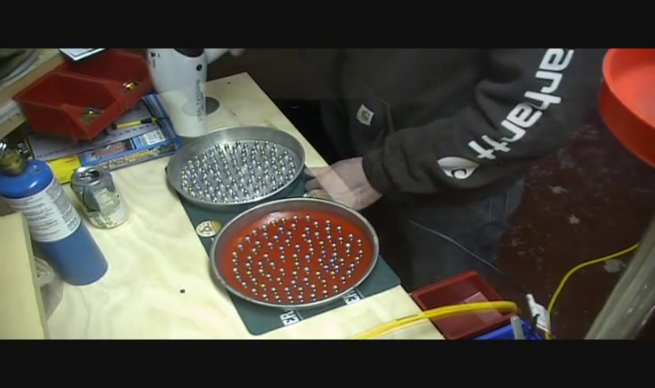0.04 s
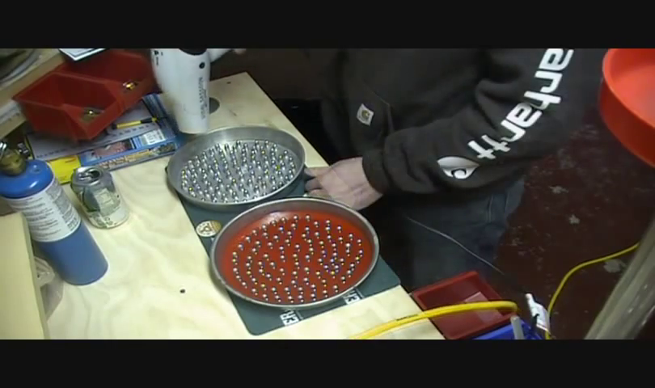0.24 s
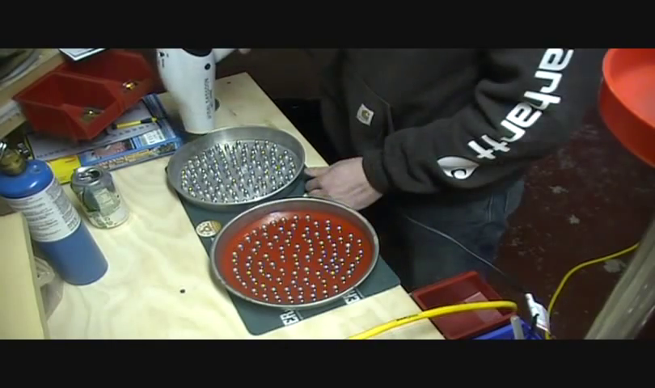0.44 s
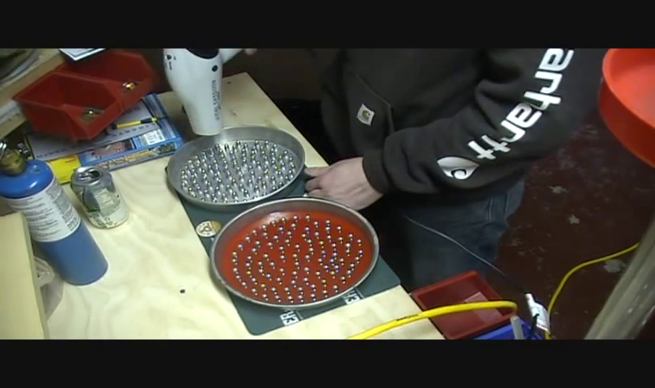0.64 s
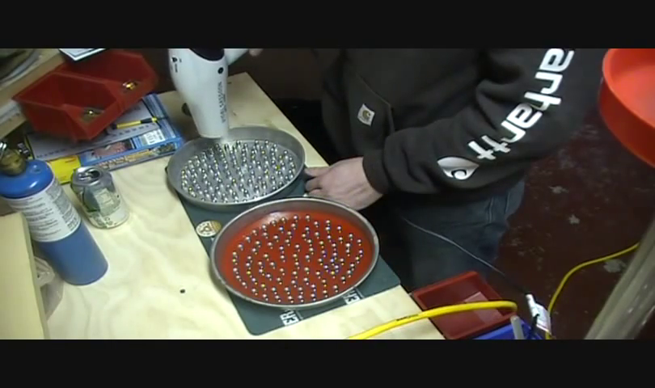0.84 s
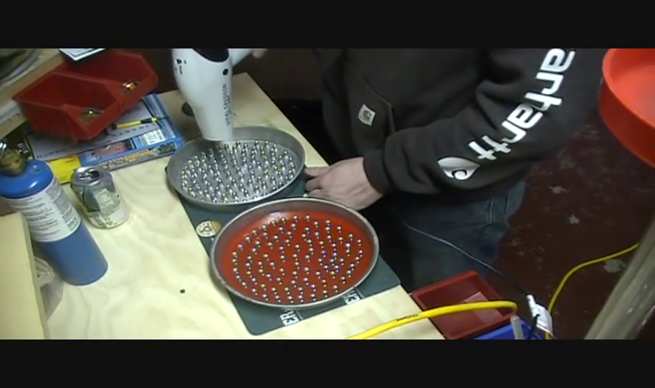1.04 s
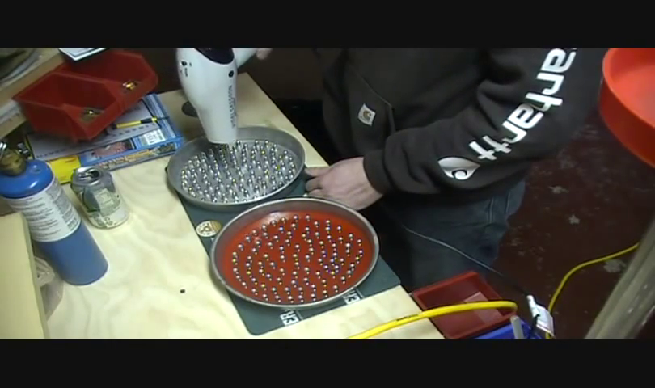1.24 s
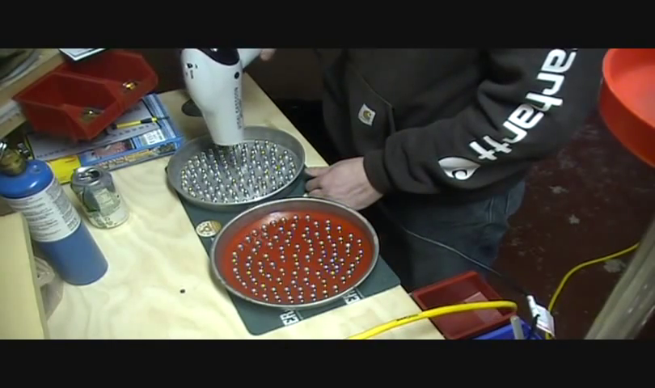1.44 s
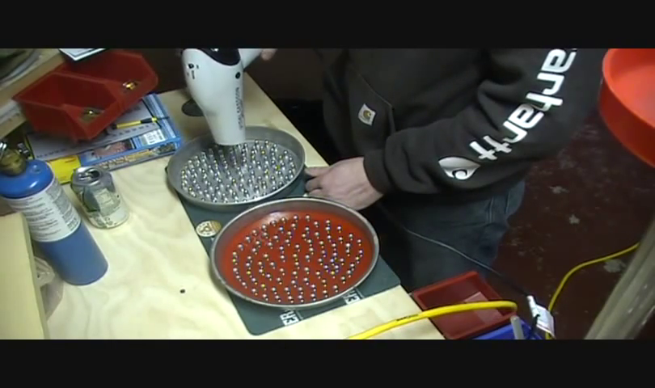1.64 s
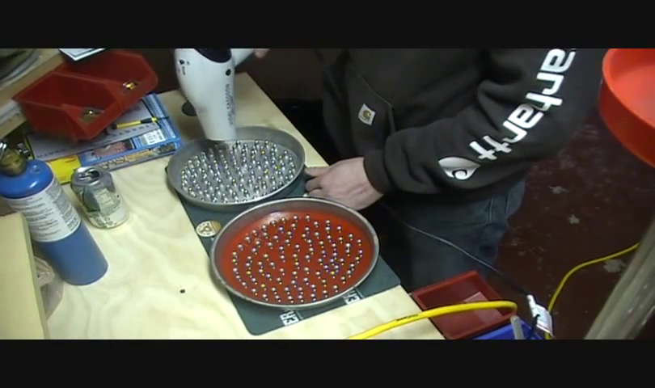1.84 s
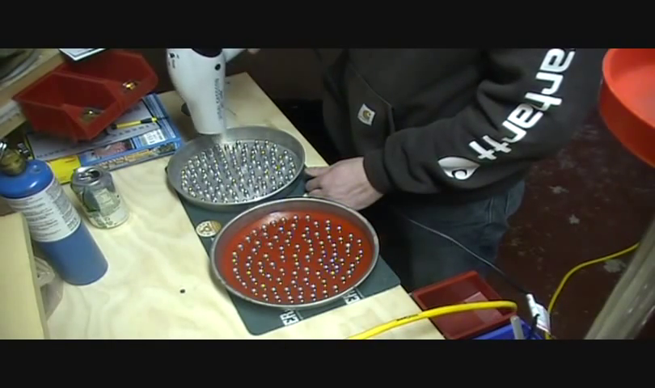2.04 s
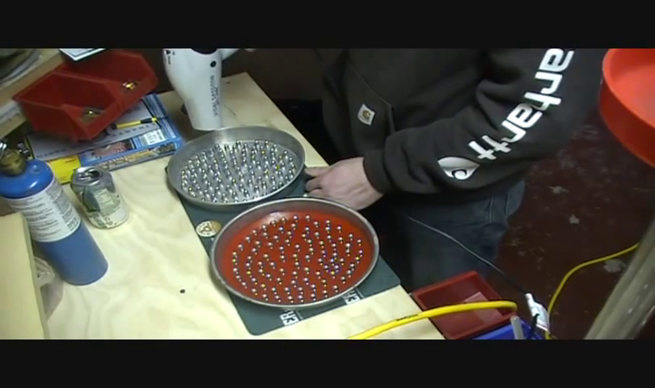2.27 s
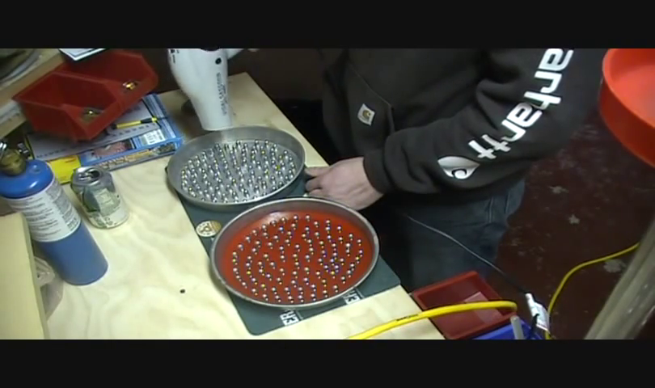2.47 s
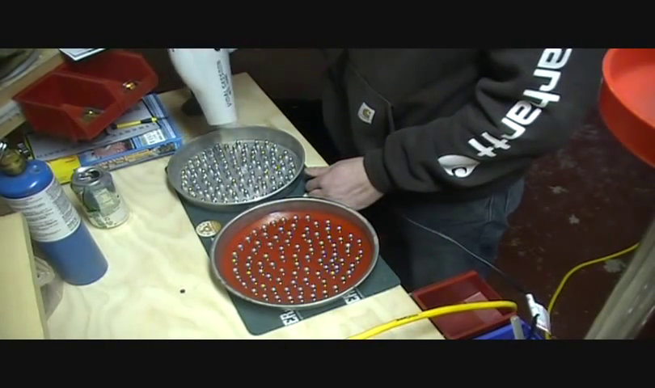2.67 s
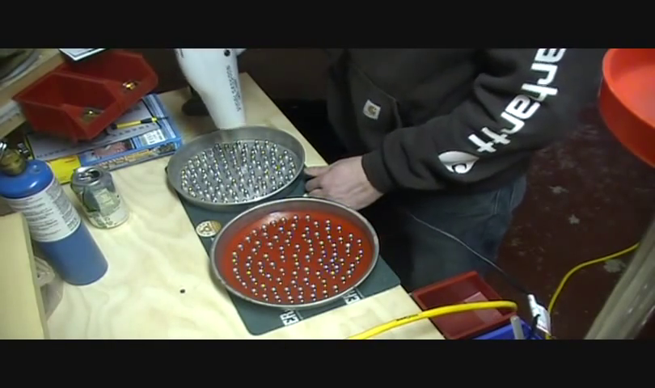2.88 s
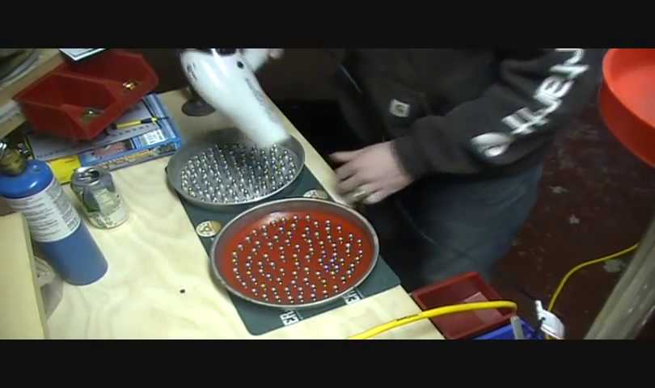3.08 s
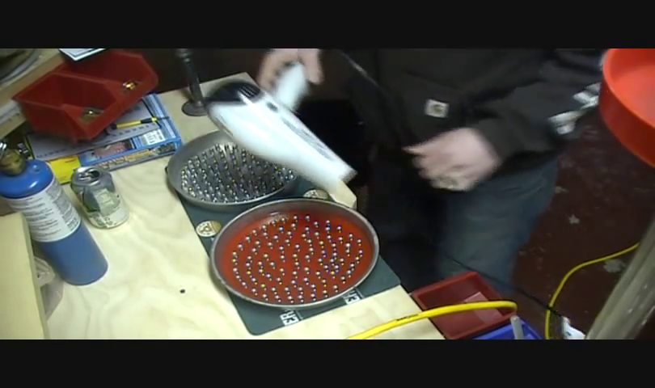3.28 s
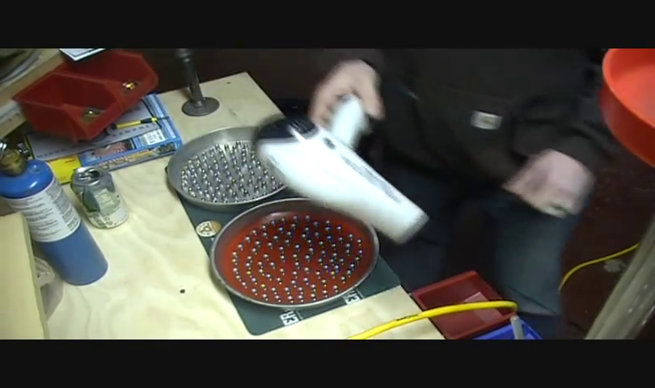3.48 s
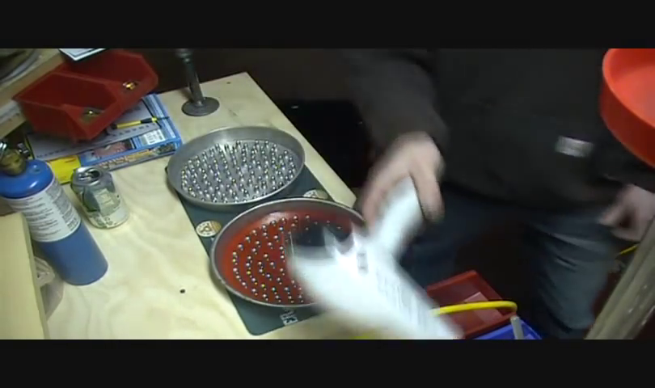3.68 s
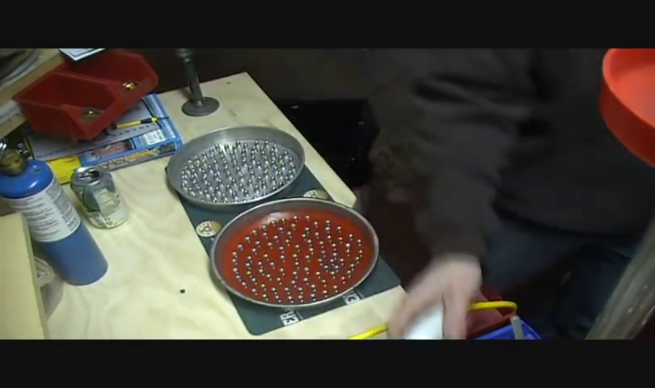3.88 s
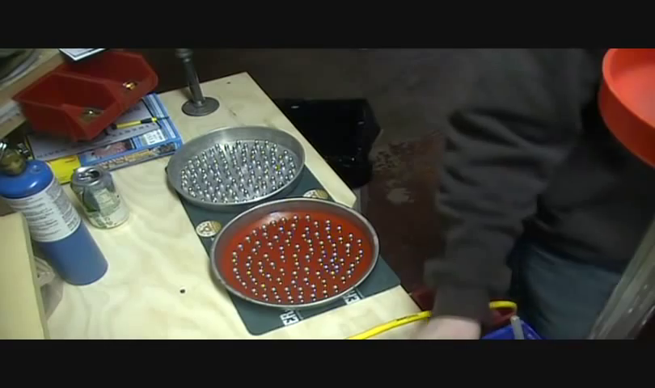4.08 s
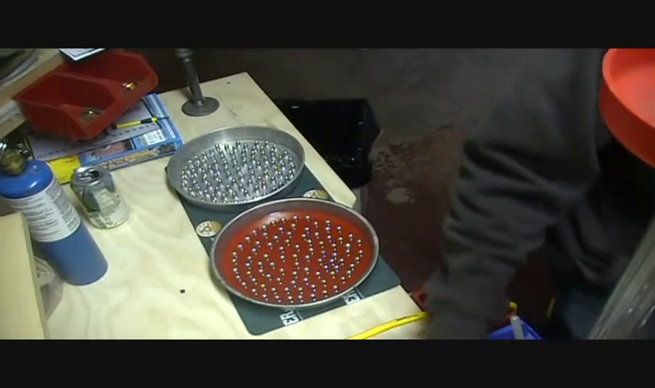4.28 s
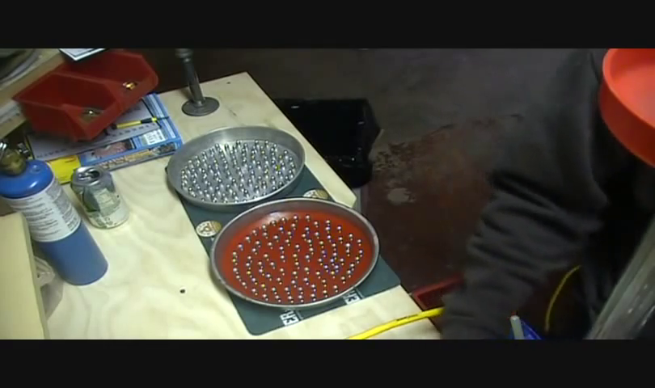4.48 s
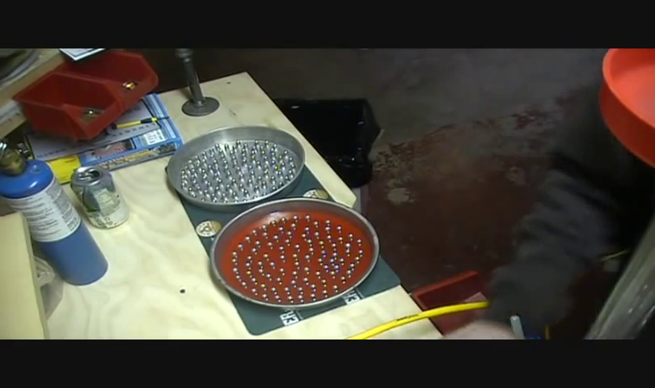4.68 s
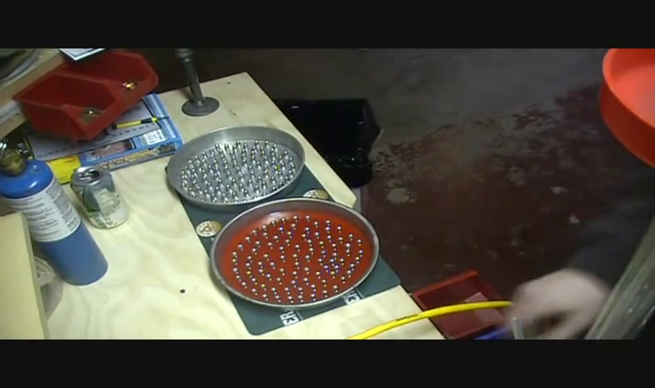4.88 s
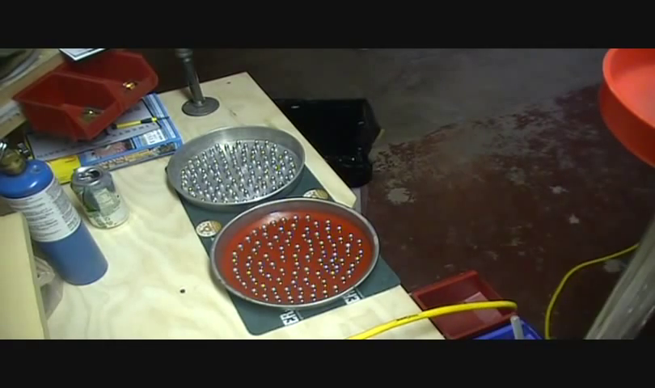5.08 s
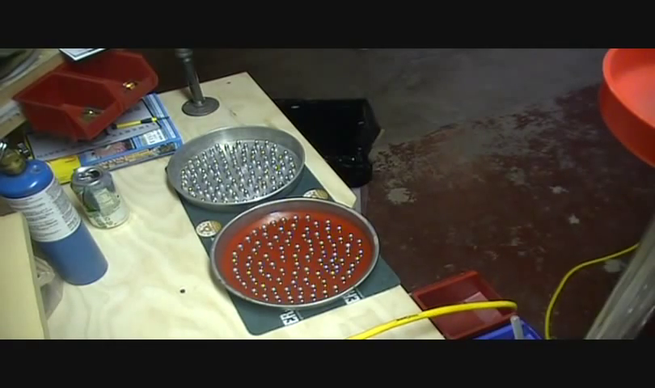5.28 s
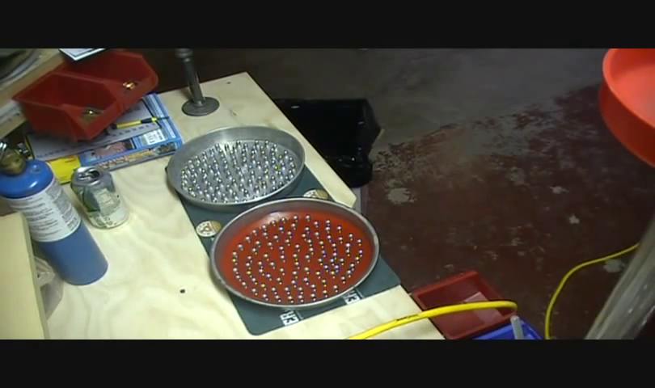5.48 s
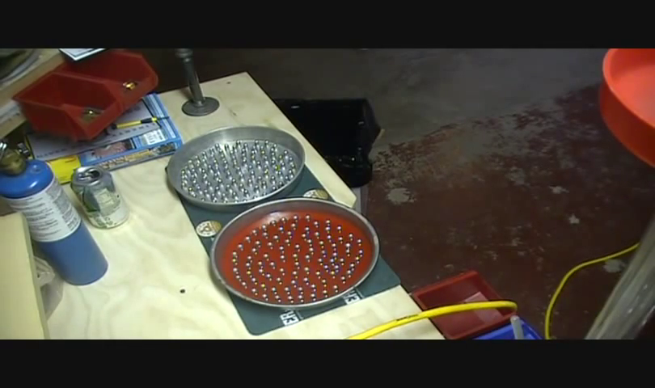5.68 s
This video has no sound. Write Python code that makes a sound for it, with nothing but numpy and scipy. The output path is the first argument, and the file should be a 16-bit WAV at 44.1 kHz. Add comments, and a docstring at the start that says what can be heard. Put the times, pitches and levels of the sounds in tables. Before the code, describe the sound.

A hair dryer runs close by in a small workshop, its broad airy roar carrying a steady whistle near 2 kHz. From about 0.2 s the air grows fuller as the nozzle drops towards a studded metal pan; sharp hiss flickers and the whistle wavers as it sweeps. At about 2.5 s the motor is cut: airflow dies and the fan whines steeply down until about 3.1 s, with a soft hollow swell. From 3.2 to 3.8 s cloth-like rustles mix with a cord's stick-slip scrape and plastic tray knocks, then the dryer's shell knocks at 3.75 s. The tray rattles again at 4.03-4.2 s. Loud dry knocks with a low thud land on the wooden bench at 4.36 s, and a sharper, louder rap at 4.59 s. Swishes swell after 5 s; a tool clinks brightly at 5.3 s and a pan faintly at 5.6 s. Quiet room noise lies beneath; close stereo microphone, short reverberation.

```python
"""A hair dryer (noise bands and blade-rate whistles) is swept over a metal pan in a small workshop.
It is switched off: the airflow dies and the fan whines down, with a soft hollow swell of noise.
Then cloth-like noise swells and swishes, and the cord drags over a plastic tray as stick-slip noise.
Tray and dryer are knocked, the dryer goes down on the wooden bench, a tool and a pan clink: struck modes.
Quiet room noise lies under everything."""
import sys
import numpy as np
from scipy import signal
from scipy.fft import rfft, irfft
from scipy.io import wavfile
from scipy.ndimage import uniform_filter1d, minimum_filter1d

SR = 44100
rng = np.random.default_rng(int(sys.argv[2]) if len(sys.argv) > 2 else 0)


def unload_wav(signal):
    """Save mono or channel-first audio to the path in sys.argv[1] as 16-bit WAV at rate SR, clipped to [-1, 1]."""
    wavfile.write(
        sys.argv[1],
        SR,
        np.round(np.clip(np.atleast_2d(signal).T, -1, 1) * 32767).astype(np.int16),
    )


N = 252252
T = np.arange(N) / SR
HZ = np.maximum(np.fft.rfftfreq(N, 1 / SR), 1)


def amp(db):
    """Decibels to gain."""
    return 10 ** (np.asarray(db) / 20)


def unit(x):
    """Scale to rms 1."""
    return x / np.sqrt(np.mean(x ** 2) + 1e-20)


def in_time(rows):
    """The columns of a curve at every sample."""
    s, *columns = np.transpose(rows)
    return [np.interp(T, s, c) for c in columns]


def at_hz(points, hz):
    """Read a table on a log-frequency axis."""
    f, value = np.transpose(points)
    return np.interp(np.log(hz), np.log(f), value)


def swell(middle_s, length_s):
    """A smooth rise and fall of height 1, length_s wide at half height."""
    return .5 ** ((2 * (T - middle_s) / length_s) ** 2)


def drift(corner_hz):
    """Slow chance with rms 1: noise falling off above corner_hz."""
    spectrum = rfft(rng.standard_normal(N)) / (1 + (HZ / corner_hz) ** 2)
    return unit(irfft(spectrum, N))


def lift_db(hz, resonances):
    """How much a set of resonances lifts each frequency."""
    return sum(lift / (1 + (2 * (hz - centre) / width) ** 2) for centre, width, lift in resonances)


# Stereo width. Each row: frequency in Hz, unrelated side against mid in dB.
SIDE_WIDTH = [(60, -17), (200, -16), (500, -19.5), (1100, -12), (1700, -15), (2600, -10), (3500, -10),
              (4400, -15), (6000, -15.5), (7000, -16.5), (8000, -10.5), (9300, -4), (12500, -10),
              (14000, -7)]


def noise(colour, resonances=()):
    """Stereo noise with a broad colour, lifted at each resonance; the mid has rms 1."""
    gain = amp(at_hz(colour, HZ) + lift_db(HZ, resonances))
    mid, side = rfft(rng.standard_normal((2, N))) * gain
    mid = irfft(mid, N)
    side = irfft(side * amp(at_hz(SIDE_WIDTH, HZ)), N)
    return (mid + side * [[1], [-1]]) / np.std(mid)


# Reverberation. Each row: frequency in Hz, decay by 60 dB in seconds.
ROOM_DECAY = [(125, 0.9), (500, 0.5), (1200, 0.52), (2800, 0.54), (6000, 0.36), (12000, 0.4)]
# Echo colour. Each row: frequency in Hz, relative level in dB.
ECHO_COLOUR = [(100, -5.5), (700, 8), (1250, 4), (3000, 1.5), (7000, 6), (13000, -1)]


def workshop(early_db=2.0, early_s=0.03, gap_s=0.0017, scatter_db=3., spots=5):
    """Echoes of a click at several spots: reflections off the bench, then a grainy tail dying band by band."""
    t, echo = T[:SR], 0
    wash = np.stack(np.split(noise(ECHO_COLOUR)[:, :spots * SR], spots, axis=1))
    edges_hz = np.geomspace(60, 15000, 9)
    for low, high in zip(edges_hz, edges_hz[1:]):
        band_pass = signal.butter(2, [low, high], "band", fs=SR, output="sos")
        band = signal.sosfilt(band_pass, np.roll(wash, int(low), axis=-1))
        t60_s = at_hz(ROOM_DECAY, np.sqrt(low * high))
        echo = echo + band * amp(-60 * t / t60_s)
    early = 1 + amp(early_db) * np.exp(-t / early_s)
    onset = 1 - np.exp(-(t / gap_s) ** 2)
    scatter = amp(scatter_db * drift(130)[:spots * SR].reshape(spots, 1, SR))
    echo = echo * early * onset * scatter
    return echo / np.sqrt(np.sum(echo ** 2) / (2 * spots))


def with_echo(tones, echo, room_db):
    """Tones in the middle, plus their echo from the workshop."""
    return tones + amp(room_db) * signal.fftconvolve(tones[None], echo, axes=1)[:, :N]


# Room noise colour. Each row: frequency in Hz, relative level per Hz in dB.
FLOOR_COLOUR = [(25, -26), (55, -17), (85, 2), (130, -1), (250, 1.5), (600, 7), (1500, 1), (5000, -20),
                (14000, -20.5)]


def room_floor(level_db=-61.5):
    """Steady coloured noise of the quiet room."""
    return amp(level_db) * noise(FLOOR_COLOUR)


def airflow(off_s=2.589, off_soft_s=0.045, half_flow_s=0.17):
    """Share of the full flow of air: near 1 while running, dying away as the fan slows."""
    coasted_s = off_soft_s * np.logaddexp(0, (T - off_s) / off_soft_s)
    return 1 / (1 + coasted_s / half_flow_s)


LEAVE_S, LEAVE_DB_PER_S = 3.05, 63


def carried_off_db():
    """Loss as the coasting dryer is carried off the pan."""
    return LEAVE_DB_PER_S * np.maximum(T - LEAVE_S, 0)


# Tilt of the dryer against the pan. Each row: time in seconds, tilt from 0 to 1.
DRYER_TILT = [(.85, 0.03), (1.15, 0.3), (1.45, 0.64), (1.7, 1), (1.9, 0.6), (2.1, 0)]
LOWER_S, LOWER_TAKES_S = 0.24, 0.048   # nozzle half way down onto the pan


def loudness(full_flow_db, raised_db, tilted_db, flow_power):
    """Gain of one voice of the dryer, from the nozzle's height, its tilt, the airflow and the distance."""
    raised = (1 - np.tanh((T - LOWER_S) / LOWER_TAKES_S)) / 2
    tilt, = in_time(DRYER_TILT)
    level_db = full_flow_db + raised_db * raised + tilted_db * tilt - carried_off_db()
    return amp(level_db) * airflow() ** flow_power


# Colours of the rush, the jet and the sharp hiss. Each row: frequency in Hz, relative level per Hz in dB.
RUSH_COLOUR = [(40, -47), (70, -72), (110, -32.5), (200, -19.5), (255, -25.5), (330, -12), (500, -3),
               (800, 2.5), (1100, 2), (1600, -1.5), (2300, -0.5), (2900, -7), (4000, -9.5), (8000, -30.5)]
JET_COLOUR = [(60, -45), (1500, -42), (2800, -9), (3300, -0.5), (4200, -2.5), (5500, 0.5), (6900, 2),
              (7700, -1), (8600, -8.5), (10000, -39), (14000, -33)]
STUD_HISS_COLOUR = [(5000, -44), (7500, -7), (8800, 6), (10200, 4), (11500, -4), (13500, -15), (15000, -52)]
# Resonances of housing and pan. Each row: centre in Hz, width in Hz, lift in dB.
HOUSING_RESONANCES = [(291, 21, 13), (358, 34, 8.5), (499.3, 31, 7.5), (724.3, 8.9, 10.5), (804, 46, -5),
                      (932, 15, 6.5), (1041, 34, 6.5), (1132, 50, 4), (1262, 11, 8.5), (1428, 21, 5.5),
                      (1552, 77, 8.5), (1591, 42, -5), (1731, 29, 7.5), (1853, 35, 8), (2103, 210, 5.5),
                      (2340, 20, 12.5), (2553, 130, 6.5), (2820, 75, 2), (3137, 15, 10), (3380, 75, 1),
                      (4680, 190, 4), (4826, 33, 7.5), (6770, 95, 7), (7180, 180, 3)]
# Nozzle passing over the pan's studs. Each row: middle in seconds, length in seconds,
# lift of the sharp hiss in dB, lift of the rush in dB.
STUD_PASSES = [(0.2, 0.087, 5, 1), (0.479, 0.12, 2, -0.5), (0.684, 0.069, 3, 3), (0.947, 0.12, 4, 1),
               (1.096, 0.042, 7, 2.5), (1.26, 0.035, 3, 1.5), (1.363, 0.044, 2, -0.5),
               (1.675, 0.11, 6.5, 0.5), (1.786, 0.072, 4, 0.5), (1.93, 0.19, 3, 1.5), (2.172, 0.1, 5, 2),
               (2.31, 0.033, 6, -1.5), (2.436, 0.074, 3.5, 1.5), (2.573, 0.41, 3, 1.5)]
DULL_ABOVE_HZ, DULL_FLOW_POWER = 1000, 1   # the upper rush fades by this extra power of the airflow
JET_SHARE = 0.24   # share of the hiss's lift in dB that the jet takes on


def air(gust_db=.5, wander_db=1.0):
    """Turbulence in the housing, duller as the fan slows; the jet on the pan; sharper hiss over its studs."""
    hiss_lift_db = sum(db * swell(s, length) for s, length, db, _ in STUD_PASSES)
    rush_lift_db = sum(db * swell(s, length) for s, length, _, db in STUD_PASSES)
    flow = noise(RUSH_COLOUR, HOUSING_RESONANCES)
    low = irfft(rfft(flow) / (1 + (HZ / DULL_ABOVE_HZ) ** 4), N)
    flow = low + (flow - low) * airflow() ** DULL_FLOW_POWER
    rush_gain = loudness(full_flow_db=-23.5, raised_db=-3, tilted_db=-1.5, flow_power=2)
    jet_gain = loudness(full_flow_db=-20.5, raised_db=-3, tilted_db=0.5, flow_power=3.5)
    stud_gain = loudness(full_flow_db=-34, raised_db=-3.5, tilted_db=-1.5, flow_power=4)
    rush = rush_gain * amp(rush_lift_db + wander_db * drift(13.6)) * flow
    jet = jet_gain * amp(JET_SHARE * hiss_lift_db) * noise(JET_COLOUR, HOUSING_RESONANCES)
    studs = stud_gain * amp(hiss_lift_db) * noise(STUD_HISS_COLOUR)
    return rush + (jet + studs) * amp(gust_db * drift(43))


RELEASE_S, RELEASE_TAKES_S = 2.455, 0.0086   # the motor stops driving


def coasting():
    """0 while the motor drives the fan, 1 once it runs free."""
    return (1 + np.tanh((T - RELEASE_S) / RELEASE_TAKES_S)) / 2


# The fan running, then coasting. Each row: time in seconds, blade rate in Hz.
BLADE_RATE = [(0, 2031), (.4, 2023), (1.2, 2023), (1.45, 2027), (1.9, 2055), (2.05, 2054), (2.45, 2033),
              (2.495, 2020), (2.525, 1860), (2.585, 1710), (2.645, 1380), (2.71, 1085), (2.77, 895),
              (2.85, 640), (2.93, 430), (3.0, 335), (3.1, 235), (3.4, 100)]


def blade_phase():
    """Angle of the blade-passing cycle, in radians."""
    return 2 * np.pi * np.cumsum(in_time(BLADE_RATE)[0]) / SR


# Successive multiples of the blade rate, from 1. Each row: level at full flow in dB,
# change with the nozzle raised in dB, change when tilted in dB, power of the airflow.
BLADE_WHISTLES = [(-27, 4, 1, 2.27), (-29.5, -10, -13, 4.3), (-36, -7, 5.5, 4.6), (-44, -12, -15, 5),
                  (-54, -9, 2, 5)]
# Whistles sinking or rising briefly. Each row: middle in seconds, length in seconds,
# cut of the first, of the second and of the higher ones in dB (negative makes louder).
WHISTLE_TURNS = [(1.19, 0.094, 9.8, -0.5, -5), (1.35, 0.083, 5.1, -2, -8), (1.59, 0.037, 7.5, 4, 6),
                 (1.69, 0.053, 15, 1, 1.5), (1.86, 0.056, 7.4, 10, 10), (2.0, 0.16, 2.6, -1, 3),
                 (2.13, 0.075, 18, 4, -7.5), (2.33, 0.056, 2.8, 5.5, 19)]


def fan(echo, waver_db=1.5, room_db=-14, jitter_rad=0.031, wander_rad=0.41):
    """The driven blades whistle on multiples of their passing rate, wavering a little in pitch and level."""
    phase = blade_phase() + jitter_rad * drift(33) + wander_rad * drift(5.4)
    tones = 0
    for k, law in enumerate(BLADE_WHISTLES):
        cut_db = sum(cuts[min(k, 2)] * swell(s, length) for s, length, *cuts in WHISTLE_TURNS)
        gain = loudness(*law) * amp(waver_db * drift(12) - cut_db)
        tones = tones + gain * np.sin((k + 1) * phase)
    tones = np.sqrt(2) * tones * (1 - coasting())
    return with_echo(tones, echo, room_db)


# Tones of the coasting fan. Each row: multiple of the blade rate, level in dB before WHINE_RESPONSE,
# fading in dB per second.
WHINE_TONES = [(8 / 11, -35, 48), (1, -26.5, 50), (2, -46.5, 13)]
# Response along the sweep. Each row: frequency in Hz, gain in dB.
WHINE_RESPONSE = [(200, -34), (450, -13), (600, -6.5), (780, -4.5), (950, -1), (1300, -2), (1800, 2.5),
                  (3000, -11.5), (8000, -31)]
# Housing rings that the tones sweep through. Each row: centre in Hz, width in Hz, level in dB.
SWEPT_RINGS = [(746, 14, 8), (1254, 35, -3)]
RATIO_STEPS = 11   # multiples are rounded to elevenths


def run_down(echo, room_db=-6, flutter_db=1.6, jitter_rad=0.3):
    """The free fan whines downwards; its tones fall together in fixed ratios and set the housing ringing."""
    blade_hz = in_time(BLADE_RATE)[0]
    since_s = np.maximum(T - RELEASE_S, 0)
    phase = blade_phase() + jitter_rad * drift(34)
    tones = 0
    for multiple, db, fade_db_per_s in WHINE_TONES:
        response_db = at_hz(WHINE_RESPONSE, multiple * blade_hz)
        level_db = db - fade_db_per_s * since_s + response_db + flutter_db * drift(19)
        ratio = round(multiple * RATIO_STEPS) / RATIO_STEPS
        tones = tones + amp(level_db) * np.sin(ratio * phase)
    tones = np.sqrt(2) * tones * coasting() * amp(-carried_off_db())
    rings = 0
    for hz, width_hz, db in SWEPT_RINGS:
        rings = rings + amp(db) * signal.lfilter(*signal.iirpeak(hz, hz / width_hz, fs=SR), tones)
    return with_echo(tones + rings, echo, room_db)


# Swell colour. Each row: frequency in Hz, relative level per Hz in dB.
HOLLOW_SWELL_COLOUR = [(200, -42), (560, -10), (800, -4), (1250, 6), (1550, -18), (5000, -34)]


def hollow_swell(middle_s=2.97, length_s=0.14, level_db=-49.5, grain_db=1.5):
    """A soft hollow swell of grainy noise while the fan whines down."""
    return amp(level_db + grain_db * drift(60)) * swell(middle_s, length_s) * noise(HOLLOW_SWELL_COLOUR)


# Swells of soft noise, some of them following the knocks. Each row: middle in seconds,
# length in seconds, dull shuffle in dB, swish in dB.
CLOTH_SWELLS = [(3.24, 0.22, -61, -62.5), (3.542, 0.15, -48.5, -50.5), (3.823, 0.16, -52, -65),
                (4.267, 0.32, -53, -58.5), (4.551, 0.064, -56, -58), (4.96, 0.048, -94, -61),
                (5.047, 0.082, -62, -58), (5.209, 0.1, -52.5, -55.5), (5.377, 0.12, -46, -48),
                (5.51, 0.14, -52.5, -52)]
# Cloth colours. Each row: frequency in Hz, relative level per Hz in dB.
SHUFFLE_COLOUR = [(60, -34), (140, -26), (300, 2.5), (600, 4), (1000, 8), (2200, 6.5), (3500, -0.5),
                  (6000, -22)]
SWISH_COLOUR = [(1500, -37), (3000, -3.5), (4800, 6), (7200, 4), (8500, -3), (11000, -9), (14000, -48)]
SHUFFLE_REST_DB, SWISH_REST_DB = -70.5, -68.5   # level between the swells


def clothes(grain_db=1.0):
    """Cloth-like noise in fine, uneven grains: a dull shuffle and a brighter swish that swell and sink."""
    shuffle = amp(SHUFFLE_REST_DB) + sum(amp(db) * swell(s, length) for s, length, db, _ in CLOTH_SWELLS)
    swish = amp(SWISH_REST_DB) + sum(amp(db) * swell(s, length) for s, length, _, db in CLOTH_SWELLS)
    return (shuffle * noise(SHUFFLE_COLOUR) + swish * noise(SWISH_COLOUR)) * amp(grain_db * drift(110))


# Pulls of the cord. Each row: full strength at seconds, held for seconds, strength in dB before drag_db.
CORD_PULLS = [(3.29, 0.018, -50), (3.35, 0.07, -45.5), (3.445, 0.029, -40.5), (3.55, 0.04, -33.5),
              (3.72, 0.024, -42)]
# Drag colour. Each row: frequency in Hz, relative level per Hz in dB.
CORD_COLOUR = [(80, -58), (250, 0), (450, -0.5), (700, 7), (1100, -4), (1700, -8), (3000, -12), (6000, -31)]
# Hollow of the tray. Each row: centre in Hz, width in Hz, lift in dB.
TRAY_HOLLOW = [(419, 37, 21), (600, 110, 17.5), (972, 54, 17), (1450, 200, 18)]
PULL_RISE_DB_PER_S, PULL_FALL_DB_PER_S = 147.5, 450


def cord(drag_db=-6.0, slip_db=1.8, grain_db=2.5):
    """Each pull builds up, holds and stops short; the cord sticks and slips in grains, sounding the hollow."""
    pull = 0
    for s, held_s, db in CORD_PULLS:
        rise_db = PULL_RISE_DB_PER_S * np.maximum(s - T, 0)
        fall_db = PULL_FALL_DB_PER_S * np.maximum(T - s - held_s, 0)
        pull = pull + amp(db - rise_db - fall_db)
    slips = unit(amp(slip_db * drift(55) + grain_db * drift(200)))
    return amp(drag_db) * pull * slips * noise(CORD_COLOUR, TRAY_HOLLOW)


def ring(force, hz, t60_s):
    """A unit click sets a decaying sine of initial height 1 ringing."""
    r, w = amp(-60 / (t60_s * SR)), 2 * np.pi * hz / SR
    return signal.lfilter([0, np.sin(w)], [1, -2 * r * np.cos(w), r * r], force + 1e-18)


# Crack colour. Each row: frequency in Hz, relative level per Hz in dB.
CRACK_COLOUR = [(100, -16), (300, -12), (1000, 11.5), (2500, 7), (4000, -2), (7200, 0), (9000, -11.5),
                (11500, -28), (14000, -50)]
TOUCHES_PER_S = 1500   # tiny touches after a blow


def struck(hits, modes, echoes, crack_t60_s, radiate_hz, chatter_db, chatter_t60_s, left_db):
    """Blows ring the modes through a soft or hard contact, crack briefly and echo from the spots in turn."""
    out, t, grit = np.zeros((2, N + SR)), T[:SR], noise(CRACK_COLOUR)
    radiation = signal.butter(2, radiate_hz, "high", fs=SR, output="sos")   # small bodies give off no bass
    for i, (s, db, contact_hz, crack_db, room_db) in enumerate(hits):
        at = int(s * SR)
        touches = rng.random(SR) < TOUCHES_PER_S / SR   # the surfaces rattle as they settle
        chatter = touches * rng.standard_normal(SR) * amp(-60 * t / chatter_t60_s)
        force = (t == 0) + amp(chatter_db) * chatter / np.linalg.norm(chatter)
        soft = np.exp(-2 * np.pi * contact_hz / SR)
        force = signal.lfilter([(1 - soft) ** 2], [1, -2 * soft, soft ** 2], force + 1e-18)
        body = 0
        for k, (hz, mode_db, t60_s) in enumerate(modes):
            body = body + (-1) ** k * amp(mode_db) * ring(force, hz, t60_s)
        crack = amp(crack_db - 60 * t / crack_t60_s) * np.roll(grit, at, axis=1)[:, :SR] / 2
        direct = signal.sosfilt(radiation, body + crack)
        echo = echoes[i % len(echoes)]
        wet = signal.fftconvolve(direct.mean(axis=0)[None], echo, axes=1)[:, :SR]
        out[:, at:at + SR] += amp(db) * (direct + amp(room_db) * wet)
    return out[:, :N] * amp(left_db * np.array([[.5], [-.5]]))


# Each row: time in seconds, strength in dB, contact brightness in Hz, relative crack in dB, room in dB.
TRAY_BLOWS = [(3.392, -22.5, 7000, -9.5, -6), (3.400, -29, 1500, -19, -20), (3.431, -32, 5000, -3, -8),
              (3.592, -34.5, 3000, 8, -2.5), (3.609, -31, 5000, -2, -4.5), (4.026, -19, 8000, 2, -3),
              (4.076, -30, 2800, 4, -1), (4.15, -35, 4000, 1, -12), (4.184, -44, 3500, 7, -11)]
# Each row: mode in Hz, level in dB, decay by 60 dB in seconds.
TRAY_MODES = [(437, -7, 0.015), (562, -4, 0.085), (650, 2, 0.012), (990, -11.5, 0.025), (1400, -2, 0.012),
              (1548, -12.5, 0.081), (1750, -1, 0.0085), (2200, -15, 0.017), (4770, -24, 0.028),
              (7800, -21, 0.012)]


def tray_knocks(echoes):
    """The plastic tray is knocked: short hollow modes with a long rattle."""
    return struck(TRAY_BLOWS, TRAY_MODES, echoes, crack_t60_s=0.016, radiate_hz=280,
                  chatter_db=-7.0, chatter_t60_s=0.19, left_db=-.3)


# Each row: time in seconds, strength in dB, contact brightness in Hz, relative crack in dB, room in dB.
DRYER_BLOWS = [(3.7245, -34, 3500, -11, -3), (3.7612, -20, 9000, -6.5, -10)]
# Each row: mode in Hz, level in dB, decay by 60 dB in seconds.
DRYER_MODES = [(575, -10, 0.055), (730, 0, 0.041), (843, -9, 0.13), (920, 3, 0.024), (1010, -15, .04),
               (1420, -10, 0.038), (1780, -26, 0.11), (2140, -15, 0.048), (2900, -33, 0.057),
               (4450, -9, 0.02)]


def dryer_knocks(echoes):
    """The dryer's shell is knocked: its modes ring with a longer crack."""
    return struck(DRYER_BLOWS, DRYER_MODES, echoes, crack_t60_s=0.17, radiate_hz=450,
                  chatter_db=-8.5, chatter_t60_s=0.064, left_db=-0.5)


# Each row: time in seconds, strength in dB, contact brightness in Hz, relative crack in dB, room in dB.
THUD_BLOWS = [(4.3555, -24, 2000, -34, -5.5), (4.379, -25.5, 1600, -30, -12), (4.393, -35, 1400, -29, -13),
              (4.411, -38, 1400, -30, -7), (4.432, -42, 1500, -14, -7), (4.479, -50, 1200, -14, 4),
              (4.5925, -46, 1500, -22, 1)]
# Each row: mode in Hz, level in dB, decay by 60 dB in seconds.
BENCH_TOP_MODES = [(121, -3, 0.046), (164, 5, 0.026), (237, -4.5, 0.056), (373, 2, 0.024),
                   (476, -2.5, 0.028), (760, 0, 0.014)]


def bench_thuds(echoes):
    """Weight settles on the bench top: soft contacts sound its low modes."""
    return struck(THUD_BLOWS, BENCH_TOP_MODES, echoes, crack_t60_s=.03, radiate_hz=75,
                  chatter_db=-2.5, chatter_t60_s=0.065, left_db=1.0)


# Each row: time in seconds, strength in dB, contact brightness in Hz, relative crack in dB, room in dB.
HANDLE_BLOWS = [(4.3567, -6, 8000, -13, -7), (4.3855, -22, 6000, -9, -5.5), (4.398, -16.5, 5000, -14, -10),
                (4.416, -26, 4000, -13, 1)]
# Each row: mode in Hz, level in dB, decay by 60 dB in seconds.
HANDLE_MODES = [(630, -7, 0.0076), (1390, 1, 0.0039), (1930, 0.5, 0.0047), (2580, -4.5, 0.0032),
                (4000, -9.5, 0.0025), (5070, -16, 0.0034)]


def handle_knocks(echoes):
    """The handle knocks: heavily damped modes."""
    return struck(HANDLE_BLOWS, HANDLE_MODES, echoes, crack_t60_s=0.047, radiate_hz=400,
                  chatter_db=-14.0, chatter_t60_s=0.14, left_db=0.0)


# Each row: time in seconds, strength in dB, contact brightness in Hz, relative crack in dB, room in dB.
BENCH_BLOWS = [(4.5921, -2.5, 7500, -9.5, -13.5), (4.5951, -14, 6000, -7.5, -8.5),
               (4.5995, -15.5, 4500, -11, 1.5)]
# Each row: mode in Hz, level in dB, decay by 60 dB in seconds.
BENCH_MODES = [(710, -21, 0.0072), (1090, -16, 0.0023), (1310, 6, 0.0032), (2750, 0, 0.0038),
               (3300, -4.5, 0.0053), (4270, -6, 0.0023), (5100, -10.5, 0.005)]


def bench_knocks(echoes):
    """Knocks on the wooden bench: hard contacts on modes that die in milliseconds."""
    return struck(BENCH_BLOWS, BENCH_MODES, echoes, crack_t60_s=0.036, radiate_hz=520,
                  chatter_db=-24.0, chatter_t60_s=0.09, left_db=-1.0)


# Each row: time in seconds, strength in dB, contact brightness in Hz, relative crack in dB, room in dB.
TOOL_BLOWS = [(5.3005, -17, 9000, -9, -7.5), (5.3042, -20, 9000, -7, -9.5), (5.3074, -33, 9000, 0, -3)]
# Each row: mode in Hz, level in dB, decay by 60 dB in seconds.
TOOL_MODES = [(980, -23, 0.039), (1414, -22.5, 0.14), (2100, -6.5, 0.039), (2450, -8.5, 0.018),
              (2690, -7, 0.016), (3000, -1.5, 0.019), (3200, -8, 0.022), (3530, -7, .016),
              (3900, -5, 0.022), (4230, -9, 0.02), (4810, -13, 0.018), (5250, -17, .02), (7050, -17, .018)]


def tool_clinks(echoes):
    """A tool clinks: bright contacts on high modes."""
    return struck(TOOL_BLOWS, TOOL_MODES, echoes, crack_t60_s=0.039, radiate_hz=1210,
                  chatter_db=0.0, chatter_t60_s=0.024, left_db=-1.0)


# Each row: time in seconds, strength in dB, contact brightness in Hz, relative crack in dB, room in dB.
PAN_BLOWS = [(5.590, -36, 9000, 1.5, -5.5), (5.606, -38.5, 4000, -5, -12), (5.632, -42, 1500, -4, -7)]
# Each row: mode in Hz, level in dB, decay by 60 dB in seconds.
PAN_MODES = [(463, -6, 0.03), (727, -7, 0.22), (851, -12, .2), (1030, -7.5, 0.079), (2040, -8, 0.1),
             (2250, -17, .25), (2440, -6, .05), (2610, -5, 0.07), (2980, -12, .17), (3220, -6, 0.1),
             (3520, -3, 0.05), (3720, -1, .03), (4540, -4, 0.082), (4750, -8, .03), (5005, 1.5, 0.04),
             (6060, -1, 0.05), (6400, -3, .025), (7930, -12, .04)]


def pan_clinks(echoes):
    """A pan clinks: many modes, some ringing for a quarter of a second."""
    return struck(PAN_BLOWS, PAN_MODES, echoes, crack_t60_s=0.049, radiate_hz=350,
                  chatter_db=-9.0, chatter_t60_s=0.056, left_db=0.5)


def scene():
    """The dryer, the soft noises and the blows over the quiet of the room."""
    echoes = workshop()
    dryer = air() + fan(echoes[0]) + run_down(echoes[1])
    soft_noises = hollow_swell() + clothes() + cord()
    blows = tray_knocks(echoes) + dryer_knocks(echoes) + bench_thuds(echoes) + handle_knocks(echoes)
    blows = blows + bench_knocks(echoes) + tool_clinks(echoes) + pan_clinks(echoes)
    return room_floor() + dryer + soft_noises + blows


def limiter(x, peak=.95, size=129):
    """Turns the gain down for a few milliseconds (size in samples) around any value over peak."""
    room_left = np.minimum(1, peak / (np.abs(x).max(axis=0) + 1e-9))
    return x * uniform_filter1d(minimum_filter1d(room_left, size), size)


# Microphone ports. Each row: frequency in Hz, left against right in dB.
PORT_LEAN = [(100, 0.3), (700, 0.5), (1100, 2), (2000, 0.5), (3700, 1.5), (5000, 0), (7200, -1), (8600, -4),
             (10000, 2), (11500, 3.5), (14000, 1)]
# Each row: frequency in Hz, phase lead of the left port in radians.
PORT_LEAD = [(200, -0.079), (1000, -0.28), (3000, -0.069), (7000, -0.015), (8000, -0.47), (9500, -1.55),
             (11000, -1.34), (13000, -0.63)]
MIC_LOW_HZ, CUTOFF_HZ = 86, 14100


def record(dry):
    """The two ports differ in colour and phase; bass is cut, peaks are limited, then the top is cut."""
    ports = np.array([[.5], [-.5]])
    fade_in = np.minimum(T / .006, 1)
    lean = amp(ports * at_hz(PORT_LEAN, HZ))
    lead = np.exp(1j * ports * at_hz(PORT_LEAD, HZ))
    heard = irfft(rfft(dry * fade_in) * lean * lead, N)
    heard = signal.sosfilt(signal.butter(2, MIC_LOW_HZ, "high", fs=SR, output="sos"), heard)
    heard = limiter(heard)
    return signal.sosfilt(signal.ellip(12, .1, 80, CUTOFF_HZ, fs=SR, output="sos"), heard)


dry = scene()
out = record(dry)
unload_wav(out)
```